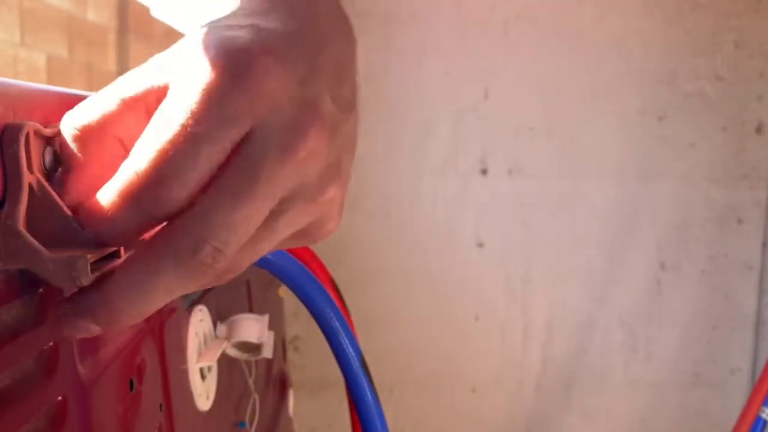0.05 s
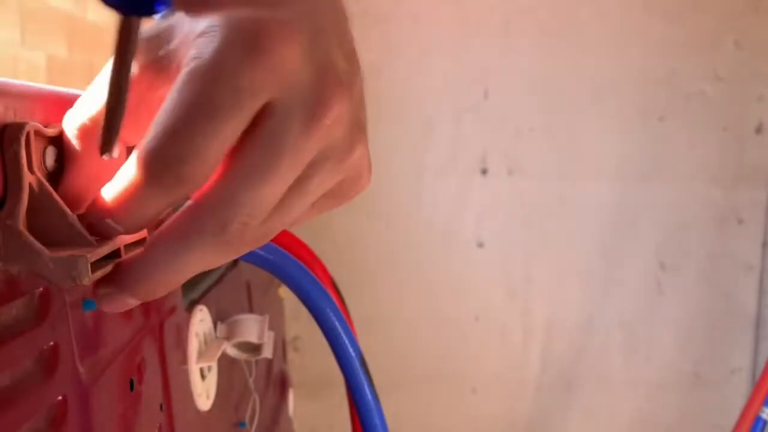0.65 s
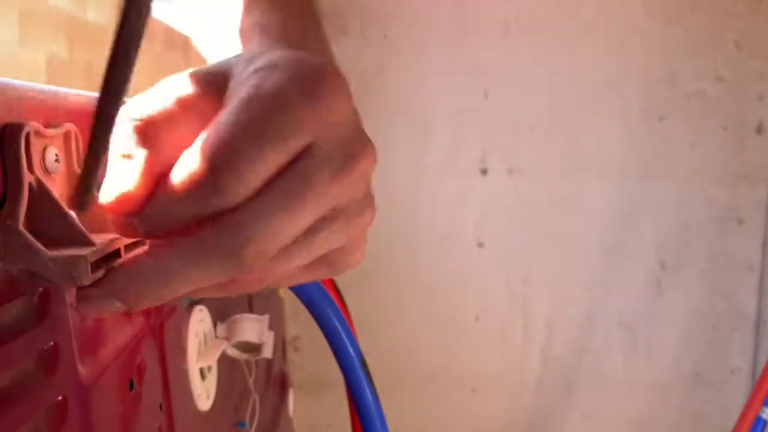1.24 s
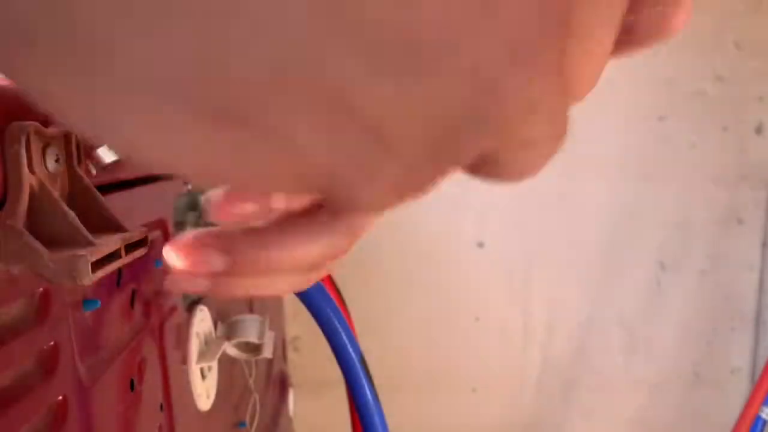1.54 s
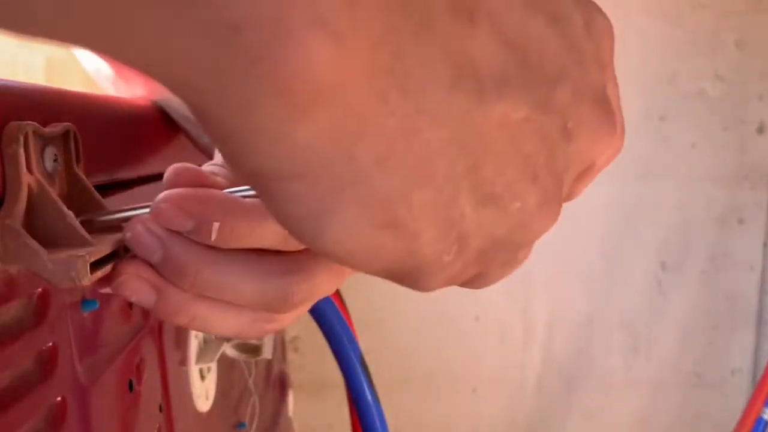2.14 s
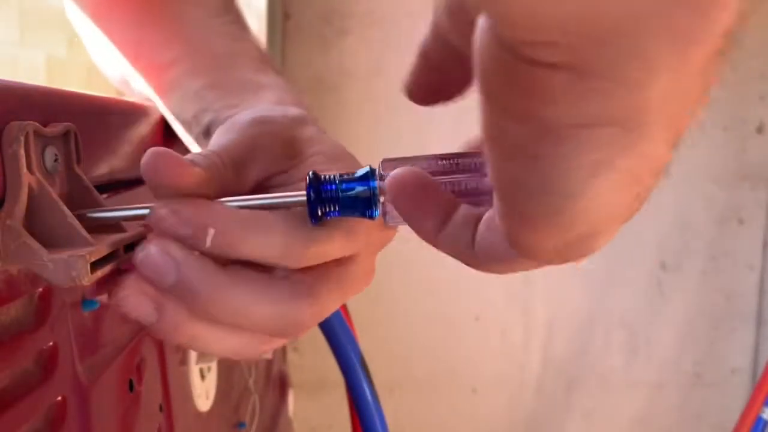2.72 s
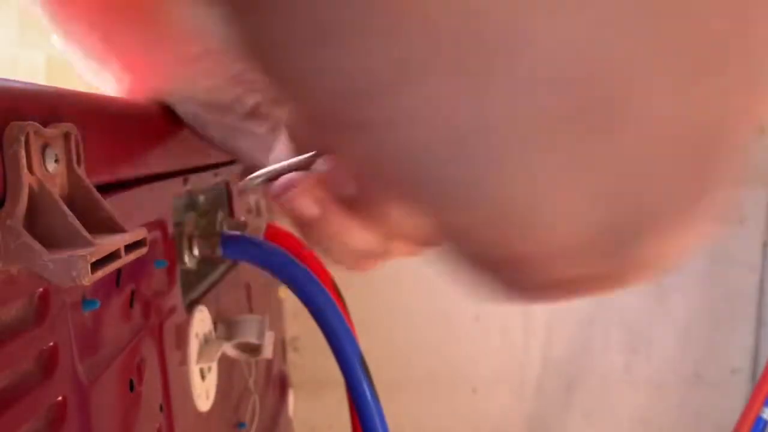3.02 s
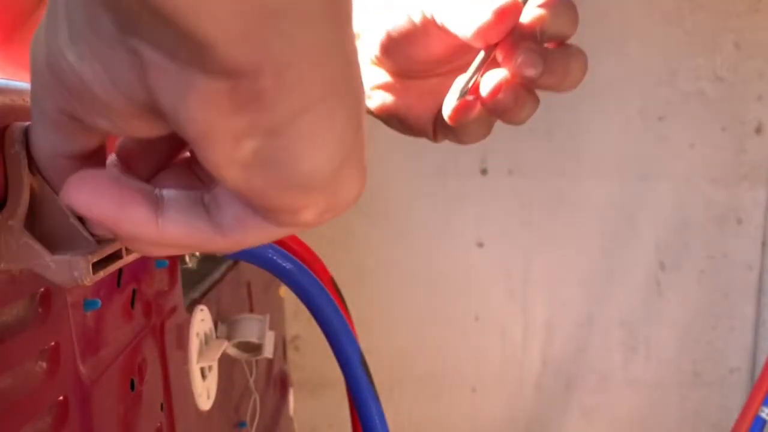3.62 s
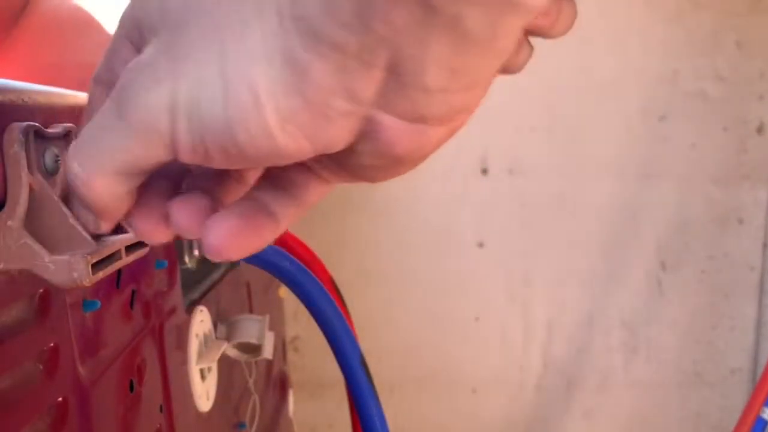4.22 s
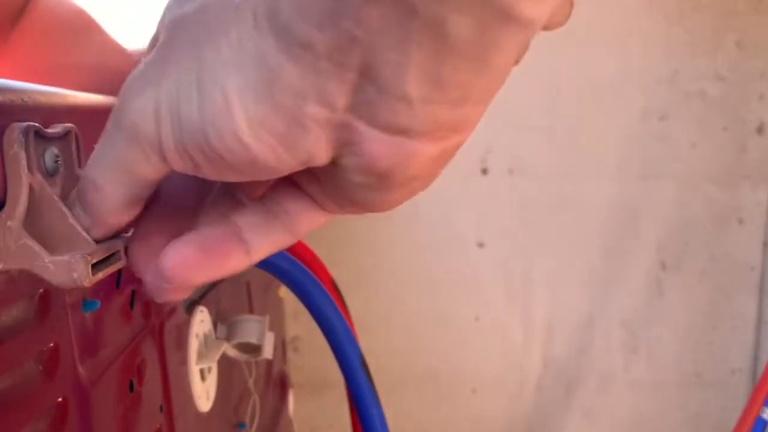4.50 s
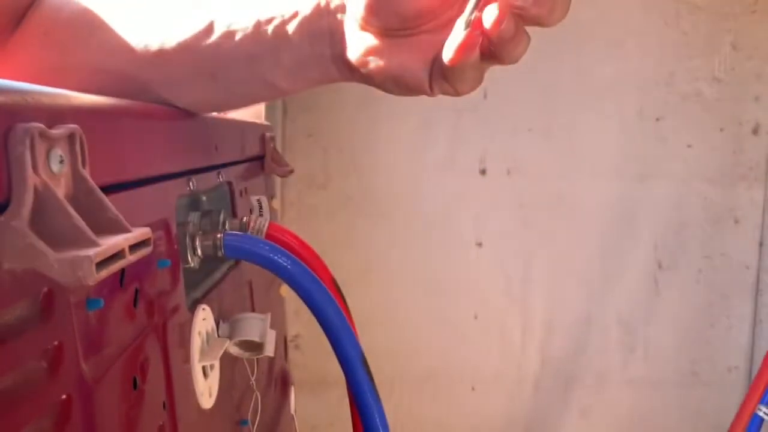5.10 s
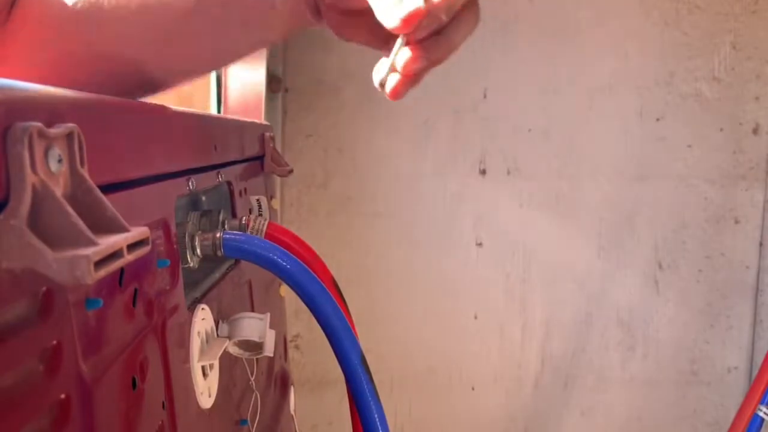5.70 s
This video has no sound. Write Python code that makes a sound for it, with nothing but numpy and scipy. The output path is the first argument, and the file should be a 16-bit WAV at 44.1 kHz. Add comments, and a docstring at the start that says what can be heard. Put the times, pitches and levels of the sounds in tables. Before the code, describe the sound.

Scattered clicks of a steel tool on plastic and soft knocks on a washing machine lid, ending with a hard plastic snap.

```python
"""In a small bare room, a screwdriver and fingers work at the plastic hinge of a washing machine lid.
Over a faint rumble, hands rub by stick-slip friction and bump the lid. Steel tip and screws tick on
the plastic; each tap excites damped modes of the hinge, the lid and the hollow sheet-metal cabinet.
A few thin squeaks come between the taps. Near the end a hard plastic part snaps down and rebounds once."""
import sys
import numpy as np
from scipy import signal
from scipy.fft import rfft, irfft, next_fast_len
from scipy.io import wavfile
from scipy.ndimage import map_coordinates

SR = 44100
rng = np.random.default_rng(int(sys.argv[2]) if len(sys.argv) > 2 else 0)


def digitize_waveform(pressure):
    """Quantize a signal to 16-bit integers and store it at the path in sys.argv[1].

    Rows of a 2-D input are taken as channels; values are limited to [-1, 1].
    """
    field = np.atleast_2d(pressure).T
    bounded = np.clip(field, -1, 1)
    quanta = np.round(bounded * 32767).astype(np.int16)
    wavfile.write(sys.argv[1], SR, quanta)


N = 253575
SCENE_T = np.arange(N) / SR
T = np.arange(int(.6 * SR)) / SR  # time within one event [s]


def amp(db):
    """Amplitude ratio of a level in decibels."""
    return 10 ** (np.asarray(db) / 20)


def unit(x):
    """Normalisation to rms 1."""
    return x / np.sqrt(np.mean(x ** 2) + 1e-20)


def at_level(x, db):
    """Normalisation of a transient to an rms level over its first 40 ms."""
    head = x[..., :int(.04 * SR)]
    return amp(db) * x / np.sqrt(np.mean(head ** 2) + 1e-20)


def along(points, hz):
    """Interpolation on a logarithmic frequency axis."""
    frequencies, values = np.transpose(points)
    return np.interp(np.log(hz + 1), np.log(frequencies), values)


def filtered(x, response):
    """Linear filtering: the spectrum is multiplied by a frequency response."""
    n = x.shape[-1]
    size = next_fast_len(n + 4096)
    return irfft(rfft(x, size) * response(np.fft.rfftfreq(size, 1 / SR)), size)[..., :n]


def coloured(x, spectrum, size=2048):
    """Minimum-phase filtering: folding the cepstrum gives a causal response with this spectrum."""
    cepstrum = irfft(np.log(amp(along(spectrum, np.fft.rfftfreq(size, 1 / SR)))))
    cepstrum[1:size // 2] *= 2
    cepstrum[size // 2:] = 0
    return signal.fftconvolve(x, irfft(np.exp(rfft(cepstrum))))[:len(x)]


def delay(hz, left_s, right_s):
    """A travel time to each channel is a phase lag proportional to frequency."""
    return np.exp(-2j * np.pi * hz * np.array([[left_s], [right_s]]))


def add(track, time, sound):
    """Superposition of a stereo sound from a given time on."""
    start = max(round(time * SR), 0)
    track[:, start:start + sound.shape[1]] += sound[:, :N - start]


def burst(spectrum, t60, spikiness=1):
    """Dense damped resonances merge into decaying noise; a high odd power breaks it into tiny slips."""
    return coloured(rng.standard_normal(len(T)) ** spikiness * amp(-60 * T / t60), spectrum)


def ring(modes, scatter_db, attack_s):
    """Free vibration: a sum of damped modes, each with random polarity and scattered strength."""
    hz, db, t60 = np.transpose(modes)[:, :, None]
    level = db + scatter_db * rng.standard_normal(db.shape)
    polarity = rng.choice([-1, 1], db.shape)
    partials = polarity * amp(level - 60 * T / t60) * np.sin(2 * np.pi * hz * T)
    return np.sum(partials, axis=0) * (1 - np.exp(-T / attack_s))


# Likeness of left and right in the diffuse field: (frequency [Hz], correlation [-1 to 1])
COHERENCE = [(60, 0.79), (150, 0.93), (300, 0.43), (640, -0.12), (1400, 0.49), (3000, -0.22),
             (7000, -0.0062)]

def diffuse(n, wall_lag_s=0.0003015):
    """A diffuse field is coherent mainly in the bass; a bare wall adds a reflection from the left."""
    angle = lambda hz: np.arccos(np.clip(along(COHERENCE, hz), -1, 1)) / 2
    weights = lambda hz: np.array([np.cos(angle(hz)), np.sin(angle(hz))])
    mid, side = filtered(rng.standard_normal((2, n)), weights)
    wall = filtered(rng.standard_normal(n), lambda hz: delay(hz, 0, wall_lag_s))
    return np.array([mid + side, mid - side]) + wall


# Reverberation time of the room: (frequency [Hz], T60 [s])
ROOM_DECAY = [(150, 0.34), (400, 0.54), (1000, 0.44), (2800, 0.23), (7000, 0.21), (14000, 0.14)]

def in_room(x, wet_db, lag_s=0.0002183, build_s=0.0033):
    """Direct sound reaches the right first; reverberation builds fast and its treble dies soonest."""
    hz, t, field = signal.stft(diffuse(len(T)), SR, nperseg=256)
    decay = amp(-60 * t / along(ROOM_DECAY, hz)[:, None])
    tail = signal.istft(field * decay, SR, nperseg=256)[1][:, :len(T)]
    tail *= 1 - np.exp(-T / build_s)
    reverb = signal.fftconvolve(x[None], tail / np.linalg.norm(tail[0]), axes=1)[:, :len(x)]
    return filtered(x, lambda f: delay(f, lag_s, 0)) + amp(wet_db) * reverb


# Spectrum of the quiet room: (frequency [Hz], density [dB])
RUMBLE_SPECTRUM = [(15, -54), (25, -24), (55, 4), (92, -9.5), (123, -2), (153, -8), (195, -5), (335, -14),
                   (405, -9), (476, -16), (818, -16), (1520, -31.5), (2480, -42), (2840, -46.5),
                   (16000, -52.5)]
# Slow drift of the rumble: (time [s], relative level [dB])
RUMBLE_LEVELS = [(0.0, -54.5), (1.31, -55.5), (1.84, -57.5), (2.53, -50.5), (2.88, -55.5), (3.94, -55.5),
                 (4.16, -58), (5.75, -57)]

def room_tone(gain_db=4, hum_hz=120, hum_db=-65):
    """Background noise: a diffuse low rumble with a trace of hiss and mains hum."""
    rumble = unit(filtered(diffuse(N), lambda hz: amp(along(RUMBLE_SPECTRUM, hz))))
    level = np.interp(SCENE_T, *np.transpose(RUMBLE_LEVELS)) + gain_db
    hum = amp(hum_db) * np.sin(2 * np.pi * hum_hz * SCENE_T)
    return rumble * amp(level) + hum


# Modes of the plastic hinge: (frequency [Hz], level [dB], T60 [s])
HINGE_MODES = [(1350, 0, .025), (1560, -4, .02), (2400, -4, .02), (2700, 1, .03), (3120, 1, .028),
               (3600, 0, .022), (4350, 0, .022), (4850, -1, .022), (5500, 2, .028), (6450, 0, .02)]

def friction(spectrum, grain_db, grain_hz, ring_db, catch_db=-2.0, catch_hz=70):
    """Stick-slip friction: uneven slips, bunched where the surface catches, drive the hinge's modes."""
    wander = lambda hz: map_coordinates(rng.standard_normal(N), [np.arange(N) * hz / SR], order=1)
    slips = amp(grain_db * wander(grain_hz) + catch_db * wander(catch_hz)) * rng.standard_normal(N)
    hinge = signal.fftconvolve(slips, ring(HINGE_MODES, scatter_db=0, attack_s=.0003))[:N]
    sliding = coloured(unit(slips) + amp(ring_db) * unit(hinge), spectrum)
    return unit(in_room(sliding, wet_db=-1))


# Friction spectra of skin and of nails or steel: (frequency [Hz], density [dB])
RUB_SPECTRUM = [(200, 15), (700, 15.5), (1500, 11.5), (2200, 6.5), (3500, 6), (6000, -8.5), (9000, -30.5),
                (15000, -55.5)]
SCRATCH_SPECTRUM = [(1800, -7.5), (2300, -3.5), (2900, -4), (3500, 0), (3800, -1.5), (4300, 2),
                    (4900, -4.5), (5400, -2), (6900, -7), (7700, 7), (9000, 5.5), (10800, 3), (12500, -8.5),
                    (14000, -1), (16000, -44)]
# Strokes over the lid: (time [s], duration [s], relative rub level [dB], relative scratch level [dB])
STROKES = [(0.0, 0.02, -61.5, -65.5), (0.119, 0.07, -68.5, -86.5), (0.42, 0.018, -64.5, -67),
           (0.604, 0.048, -64.5, -74), (0.771, 0.02, -90, -74.5), (0.84, 0.063, -70, -76.5),
           (0.935, 0.093, -65.5, -64.5), (1.064, 0.088, -68, -88), (1.097, 0.036, -81, -70.5),
           (1.914, 0.018, -55.5, -67), (2.835, 0.0093, -61, -67.5), (3.244, 0.064, -69, -73.5),
           (3.392, 0.034, -71, -82), (3.597, 0.11, -66.5, -78.5), (3.765, 0.11, -71.5, -79),
           (4.248, 0.02, -63, -68), (4.327, 0.015, -58, -67.5), (4.622, 0.014, -64, -75.5),
           (5.124, 0.37, -79, -81), (5.21, 0.24, -70, -84), (5.478, 0.083, -64.5, -68.5),
           (5.566, 0.088, -76.5, -64)]

def rubbing(rise_s=0.0064, fade_db_per_s=232.5):
    """Friction noise, dull from skin and fine from nails and steel, dies away as the hand lifts."""
    out = np.zeros((2, N))
    rub = friction(RUB_SPECTRUM, grain_db=5, grain_hz=400, ring_db=-6)
    scratch = friction(SCRATCH_SPECTRUM, grain_db=6, grain_hz=450, ring_db=-5)
    for time, duration, rub_db, scratch_db in STROKES:
        grip = np.clip((SCENE_T - time) / rise_s, 0, 1)
        release = amp(-fade_db_per_s * np.maximum(SCENE_T - time - duration, 0))
        out += grip * release * (amp(rub_db + 4.5) * rub + amp(scratch_db + 5) * scratch)
    return out


# Contact spectrum of the plastic: (frequency / clack pitch [ratio], density [dB])
CLACK_SPECTRUM = [(.3, -19), (.55, -3), (.8, 2), (1.1, 1), (1.6, -5), (2.3, -10), (3.2, -13.5), (5, -39)]

def hinge_clack(db, hz):
    """High internal damping: struck plastic clacks, grates and rings only briefly."""
    spectrum = np.multiply(CLACK_SPECTRUM, [hz, 1])
    grit = burst(spectrum, t60=0.19, spikiness=5)
    modes = coloured(ring(HINGE_MODES, scatter_db=2.5, attack_s=.0003), spectrum)
    strike = burst(spectrum, t60=0.007)
    plastic = at_level(strike, 0) + at_level(grit, -9) + at_level(modes, -5)
    return at_level(in_room(plastic, wet_db=4), db - 5)


# Impact spectrum of the hollow lid: (frequency [Hz], density [dB])
LID_SPECTRUM = [(150, -12.5), (300, 12), (480, 0), (800, 5.5), (1050, -11), (1400, -3.5), (2200, -31),
                (5000, -30.5)]
# Modes of the lid: (frequency [Hz], level [dB], T60 [s])
LID_MODES = [(398.4, 6, 0.083), (456, 1.5, 0.085), (524.4, -1, 0.2), (598.4, -5.5, 0.21), (628, -14, 0.12),
             (684, -25, 0.13), (770, -8, 0.26), (804, -4, 0.15), (860, -9.5, 0.14), (1210, -7.5, 0.062)]

def lid_knock(db):
    """Impulse response of the hollow lid: a noisy knock and a few distinct modes."""
    strike = at_level(burst(LID_SPECTRUM, t60=0.077), 0)
    modes = at_level(ring(LID_MODES, scatter_db=3, attack_s=0.0024), -0.5)
    return at_level(in_room(strike + modes, wet_db=2), db - 6)


# Impact spectrum of the sheet-metal cabinet: (frequency [Hz], density [dB])
CABINET_SPECTRUM = [(70, -30.5), (120, -30), (165, 14), (230, 4), (330, -6.5), (500, -20), (900, -22.5),
                    (3000, -56)]
# Modes of the cabinet: (frequency [Hz], level [dB], T60 [s])
CABINET_MODES = [(66, -14, 0.9), (168, -2, 0.16), (183, -9, 0.12), (208, -11, 0.09), (236, 1.5, 0.19),
                 (283, -5, 0.17), (319, -5, 0.3), (390, -8, 0.17)]

def cabinet_thump(db, spot_hz, spot_db=6.5, spot_octaves=0.14):
    """The point of excitation weights the modes: each spot favours those near one pitch."""
    hz, mode_db, t60 = np.transpose(CABINET_MODES)
    boost_db = spot_db * np.exp(-(np.log2(hz / spot_hz) / spot_octaves) ** 2)
    modes = np.transpose([hz, mode_db + boost_db, t60])
    thud = at_level(burst(CABINET_SPECTRUM, t60=0.059), -3)
    boom = at_level(ring(modes, scatter_db=2, attack_s=0.0048), 0)
    return at_level(in_room(thud + boom, wet_db=-6), db - 2.5)


# Bumps of the hand, in relative levels: (time [s], knock [dB], thump [dB], thump pitch [Hz])
FINGER_BUMPS = [(0.007, -47.5, -42.5, 343), (0.157, -64, -47.5, 230), (0.43, -53.5, -45.5, 239),
                (0.67, -56, -43, 168), (0.866, -55, -47.5, 167), (1.019, -51, -42.5, 239),
                (1.059, -47, -41.5, 235), (1.094, -52, -49, 228), (2.426, -36.5, -45, 320),
                (2.525, -37, -40.5, 334), (2.685, -43, -41.5, 181), (3.253, -53, -44, 243),
                (3.404, -46.5, -39.5, 234)]

def bumps():
    """A soft impact carries little treble: fingers shake lid and cabinet but barely stir the hinge."""
    out = np.zeros((2, N))
    for time, knock_db, thump_db, thump_hz in FINGER_BUMPS:
        clack = hinge_clack(knock_db - 13.5, hz=1630)
        add(out, time, clack + lid_knock(knock_db) + cabinet_thump(thump_db, thump_hz))
    return out


# Contact spectrum of the steel tip: (frequency / tick pitch [ratio], density [dB])
TICK_SPECTRUM = [(.1, -33.5), (.3, -6), (.55, -9.5), (.78, -0.5), (1, 8), (1.2, -6.5), (1.55, -9), (2, -19)]
# Modes of the screwdriver's shaft: (frequency [Hz], level [dB], T60 [s])
SHAFT_MODES = [(6030, -1, 0.025), (7950, -3, 0.02), (9430, 0, 0.027), (9840, -3, .02), (10510, 2, 0.02),
               (12600, 1, .018), (13300, -1, 0.016), (14100, 1, .016)]

def steel_tick(db, hz):
    """A hard impact excites the shaft's modes near a pitch set by the contact point; the tip skids on."""
    spectrum = np.multiply(TICK_SPECTRUM, [hz, 1])
    strike = burst(spectrum, t60=.006)
    shaft = coloured(ring(SHAFT_MODES, scatter_db=2.5, attack_s=0.0004), spectrum)
    skid = burst(spectrum, t60=0.06, spikiness=5)
    steel = at_level(strike, 0) + at_level(shaft, -6) + at_level(skid, -10)
    return at_level(in_room(steel, wet_db=-5), db - 13.5)


# Tip or screw strikes the hinge, in relative levels:
# (time [s], tick [dB], tick pitch [Hz], clack [dB], clack pitch [Hz], thump [dB], thump pitch [Hz])
TOOL_TAPS = [(0.543, -56, 8600, -67.5, 1480, -48.5, 182), (0.882, -60, 9500, -66.5, 3500, -51.5, 170),
             (0.9454, -47, 10700, -56, 3400, -48.5, 303), (1.0539, -56, 6340, -51.5, 1150, -40.5, 232),
             (1.146, -62, 10500, -54.5, 1660, -54.5, 165), (1.7706, -48, 11500, -54, 3250, -38.5, 220),
             (1.812, -37, 11100, -49.5, 3200, -59.5, 302), (1.8888, -38.5, 11100, -51.5, 3040, -51, 326),
             (1.955, -56, 10400, -58, 1510, -52, 310), (2.033, -35.5, 11600, -47.5, 2600, -33, 172),
             (2.2349, -24, 9700, -40.5, 3480, -28.5, 303), (2.417, -49, 12500, -51, 2280, -38, 170),
             (2.4227, -46.5, 8800, -50, 3530, -46, 327), (2.5304, -48, 8600, -54, 3800, -39.5, 320),
             (2.540, -43, 9100, -62, 3850, -44, 320), (2.547, -42, 12700, -49.5, 4250, -46.5, 320),
             (2.7295, -39, 14500, -47, 1230, -38, 170), (2.8498, -50, 11100, -59, 3300, -47.5, 169),
             (4.0217, -43.5, 8050, -33, 1490, -40, 400), (4.135, -27.5, 11700, -33, 3470, -28.5, 234),
             (4.154, -28, 8500, -36.5, 3900, -47, 239), (4.268, -42.5, 8600, -59, 3280, -39.5, 286),
             (4.336, -54.5, 8200, -54, 3100, -50.5, 244), (4.438, -36, 11200, -41.5, 3570, -43, 310),
             (4.4538, -40, 8440, -43, 1720, -41, 305), (4.467, -52.5, 8600, -48, 3400, -48, 322),
             (4.529, -51, 8000, -58, 1690, -47, 305)]
# The tip glances off the screw head: (time [s], relative level [dB], tick pitch [Hz])
TOOL_SKIPS = [(0.9495, -52, 10200), (0.968, -48, 10800), (0.99, -53, 9100), (1.012, -62, 9500),
              (1.782, -48, 11000), (1.8008, -45, 12500), (1.822, -55, 10500), (2.044, -52.5, 10800),
              (2.235, -33.5, 13500), (2.572, -49, 12500), (2.688, -69, 9250), (2.7299, -39, 8500),
              (2.854, -57, 11500), (3.538, -48.5, 13600), (3.549, -47, 13600), (3.562, -51, 13700),
              (4.138, -27, 8100), (4.2657, -49, 5850)]

def taps():
    """Structure-borne sound: a tap passes from hinge to lid to cabinet; a skip is only a bright tick."""
    out = np.zeros((2, N))
    for time, tick_db, tick_hz, clack_db, clack_hz, thump_db, thump_hz in TOOL_TAPS:
        knock_db = (clack_db + thump_db) / 2 + 1.5  # the lid lies between hinge and cabinet
        contact = steel_tick(tick_db, tick_hz) + hinge_clack(clack_db, clack_hz)
        body = lid_knock(knock_db) + cabinet_thump(thump_db, thump_hz)
        add(out, time, contact + body)
    for time, db, hz in TOOL_SKIPS:
        add(out, time, steel_tick(db, hz))
    return out


# Faint whistles: (time [s], duration [s], start pitch [Hz], end pitch [Hz], width [Hz], level [dB])
SQUEAK_GLIDES = [(1.275, .13, 6100, 4600, 400, -77), (4.635, .05, 3300, 3200, 400, -70),
                 (4.86, .3, 2570, 2520, 50, -83), (5.197, .05, 4400, 4100, 600, -66)]

def squeaks():
    """Amplitude modulation by noise widens a falling tone into a thin, unsteady whistle."""
    out = np.zeros((2, N))
    for time, duration, start_hz, end_hz, width_hz, db in SQUEAK_GLIDES:
        progress = np.clip(T / duration, 0, 1)
        waver = unit(filtered(rng.standard_normal(len(T)), lambda hz: np.exp(-(hz / width_hz) ** 2)))
        pitch = start_hz + progress * (end_hz - start_hz)
        tone = waver * np.sin(2 * np.pi * np.cumsum(pitch) / SR)
        add(out, time, in_room(amp(db) * np.sin(np.pi * progress) * tone, wet_db=2))
    return out


# Spectrum of one hard contact: (frequency [Hz], density [dB])
CRACK_SPECTRUM = [(150, -33), (250, 6), (340, -4), (500, 6), (750, 4.5), (1100, 1), (2100, 2), (3200, 7),
                  (5000, 7), (6500, 3.5), (10000, 6), (14500, 4), (16000, -12)]
# Modes of the plastic part and of the hollow under it: (frequency [Hz], level [dB], T60 [s])
PART_MODES = [(1143, -6, 0.11), (1530, 2, 0.13), (1958, 6, 0.12), (2243, 3, 0.1), (2907, 2, 0.16),
              (3155, 2, 0.12), (3570, 3, 0.1), (3917, 3, 0.15), (4280, 2, 0.09), (4896, 2, 0.13),
              (5474, -4, 0.15), (5712, -5, 0.17), (6420, 10, 0.05), (6960, -3, 0.13), (7779, -3, 0.15),
              (8603, -5, 0.14), (9467, 0, 0.13), (10240, -3, 0.13), (10630, -3, 0.13), (13500, -2, 0.1),
              (13860, -3, 0.11), (14237, -1, 0.12)]
HOLLOW_MODES = [(356, -8, 0.032), (416, -2, 0.13), (470, 4.5, 0.056), (627, 1.5, 0.04), (710, -11.5, 0.1),
                (817, -6.5, 0.075)]
# The part lands, then rebounds: (time [s], chatter [s], crack [dB], clack [dB], ring [dB], knock [dB])
LANDINGS = [(5.2808, .0083, -30.5, -31.5, -30, -28), (5.434, 0.0011, -72, -47, -52.5, -41)]

def snap(contacts=5, swell_db=1, clack_hz=2900, lag_s=.00003):
    """Temporal fusion: contacts within 10 ms are heard as one crack, as the part and the hollow ring."""
    out = np.zeros((2, N))
    for time, chatter_s, crack_db, clack_db, ring_db, knock_db in LANDINGS:
        for progress in np.linspace(0, 1, contacts):
            db = crack_db + swell_db * (np.sin(np.pi * progress) - .5)  # middle contacts press hardest
            crack = in_room(burst(CRACK_SPECTRUM, t60=0.0024), wet_db=1.5)
            # the shock spreads over the wide lid, which sends a different wave to each side
            spread = np.array([burst(CRACK_SPECTRUM, t60=0.0058) for side in range(2)])
            add(out, time + progress * chatter_s, at_level(crack, db) + at_level(spread, db - 2.5))
        spectrum = np.multiply(CLACK_SPECTRUM, [clack_hz, 1])
        clack = in_room(burst(spectrum, t60=0.037), wet_db=-4.5, lag_s=lag_s)
        part = in_room(ring(PART_MODES, scatter_db=1, attack_s=0.0008), wet_db=-18, lag_s=lag_s)
        hollow = in_room(ring(HOLLOW_MODES, scatter_db=1, attack_s=0.0015), wet_db=-15)
        add(out, time, at_level(clack, clack_db) + at_level(part, ring_db) + at_level(hollow, knock_db))
    return out


# Stereo balance of the work: (frequency [Hz], left minus right [dB])
BALANCE = [(60, 1.5), (130, -2.5), (250, 3.5), (900, 4), (2000, 0.5), (8000, 0)]

def scene():
    """Level difference: the cabinet stands to the left, so its low middle is stronger there."""
    work = taps() + bumps() + snap() + rubbing() + squeaks()
    side_gains = lambda hz: amp(along(BALANCE, hz) * np.array([[.5], [-.5]]))
    return filtered(work, side_gains) + room_tone()


def record(dry, cutoff_hz=16000):
    """Band limiting: a steep low-pass removes the highest treble."""
    return filtered(dry, lambda hz: 1 / np.sqrt(1 + (hz / cutoff_hz) ** 160))


dry = scene()
out = record(dry)
digitize_waveform(out)
```